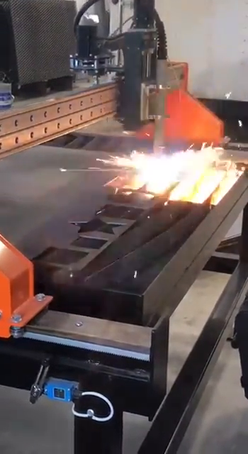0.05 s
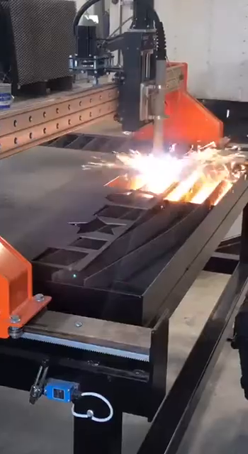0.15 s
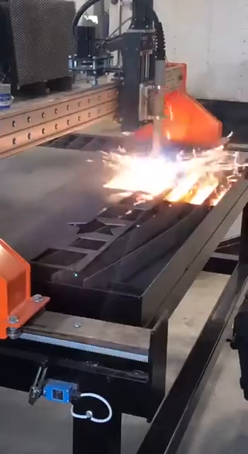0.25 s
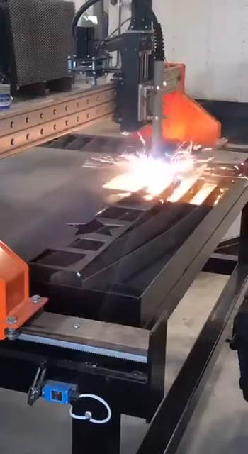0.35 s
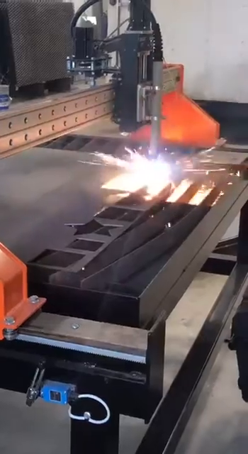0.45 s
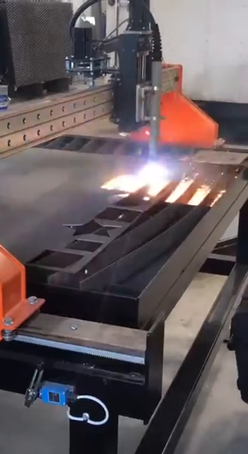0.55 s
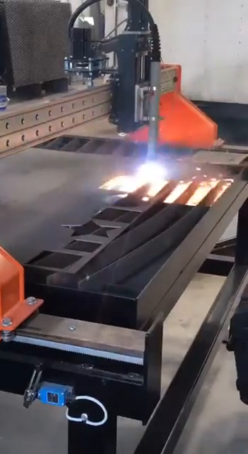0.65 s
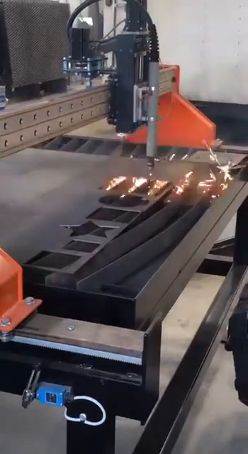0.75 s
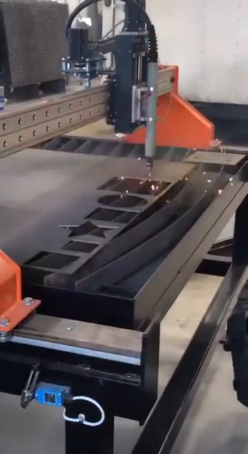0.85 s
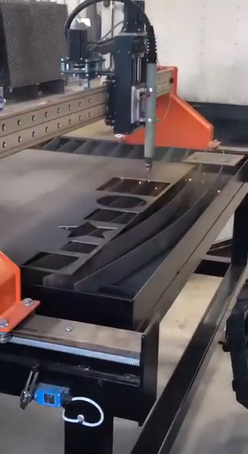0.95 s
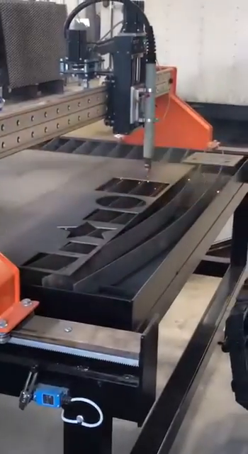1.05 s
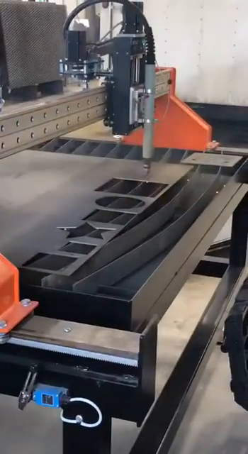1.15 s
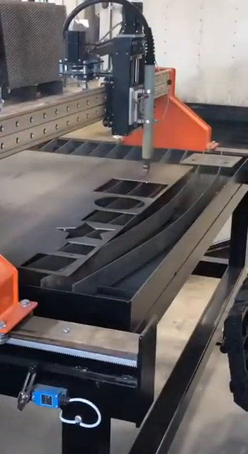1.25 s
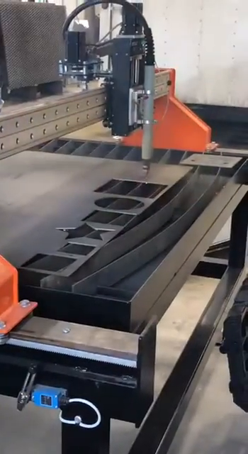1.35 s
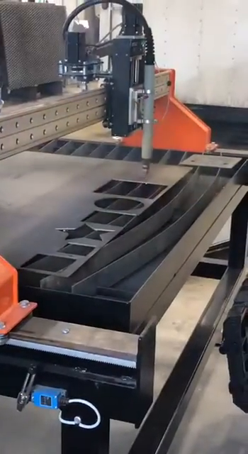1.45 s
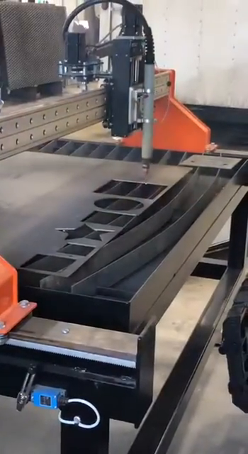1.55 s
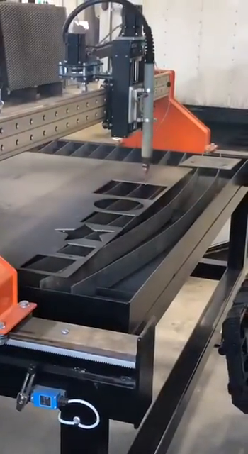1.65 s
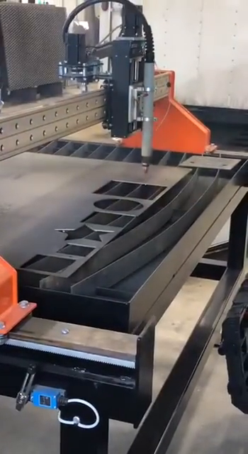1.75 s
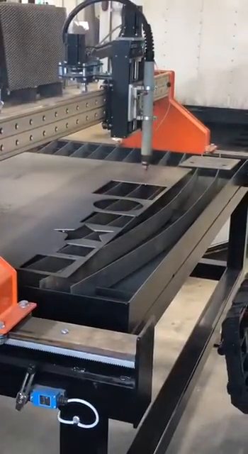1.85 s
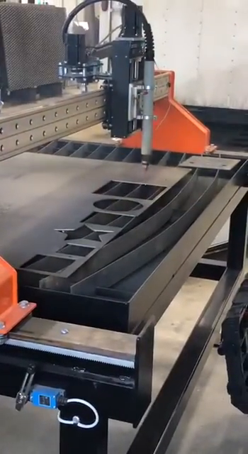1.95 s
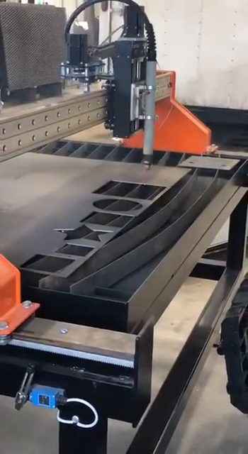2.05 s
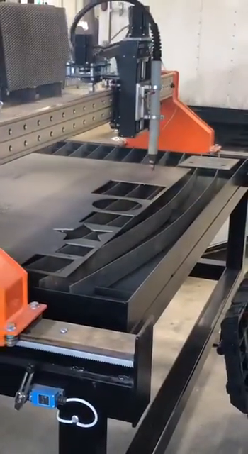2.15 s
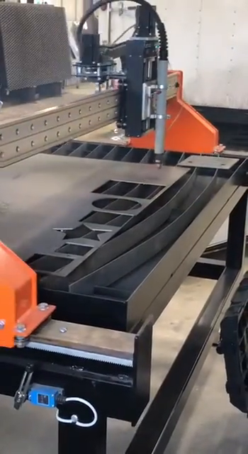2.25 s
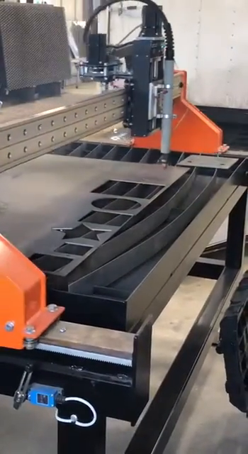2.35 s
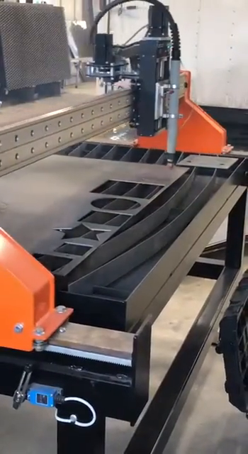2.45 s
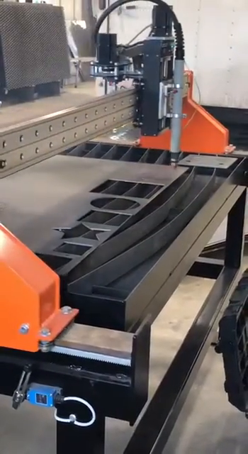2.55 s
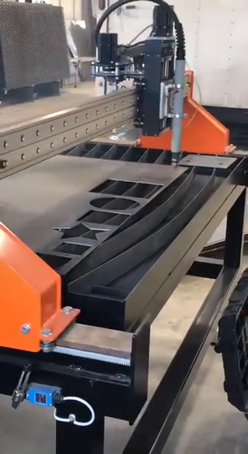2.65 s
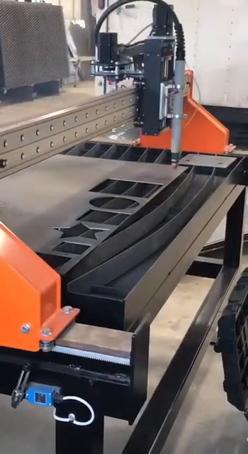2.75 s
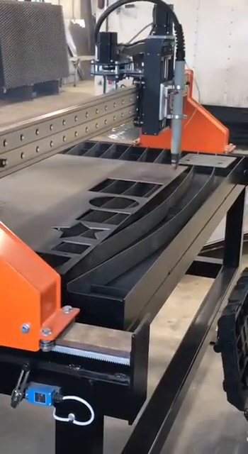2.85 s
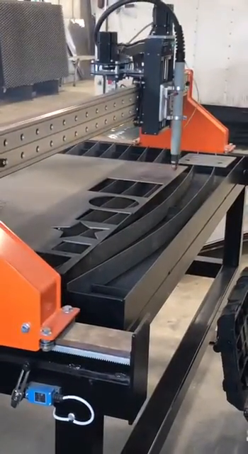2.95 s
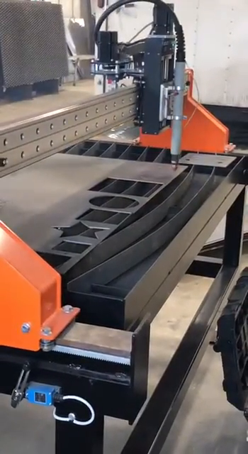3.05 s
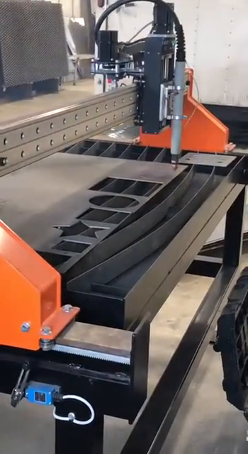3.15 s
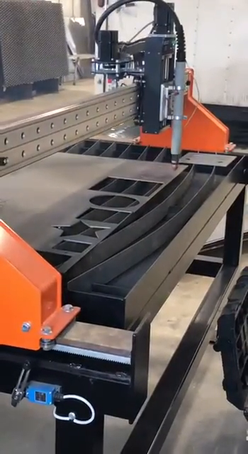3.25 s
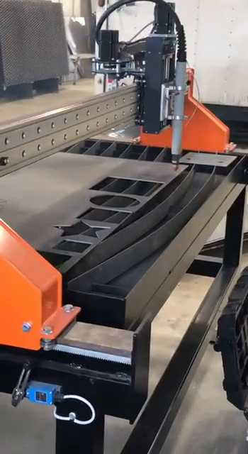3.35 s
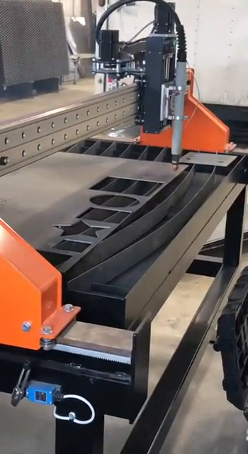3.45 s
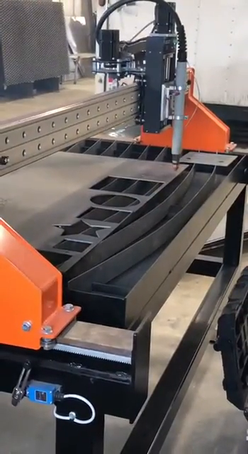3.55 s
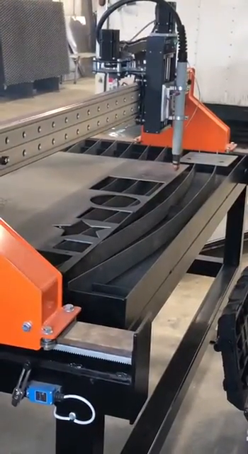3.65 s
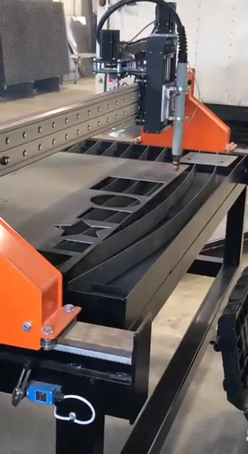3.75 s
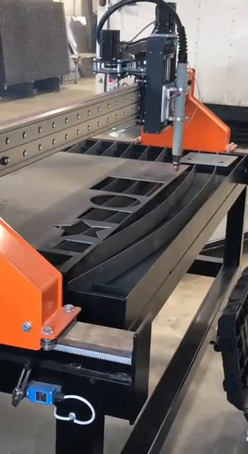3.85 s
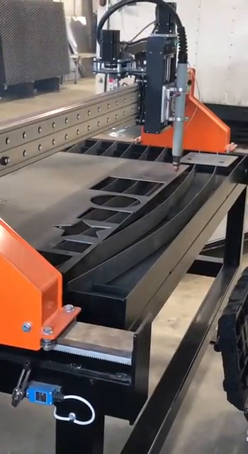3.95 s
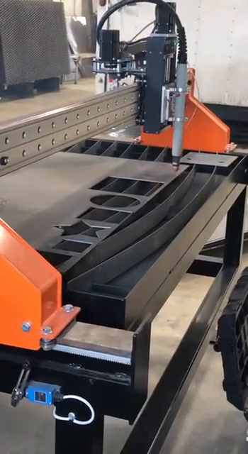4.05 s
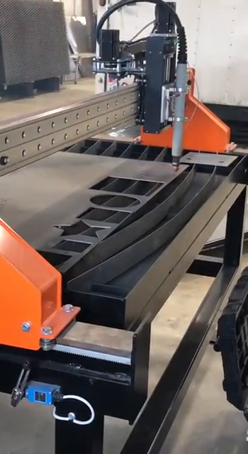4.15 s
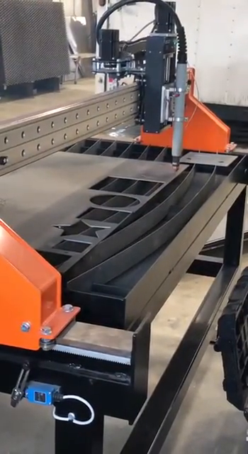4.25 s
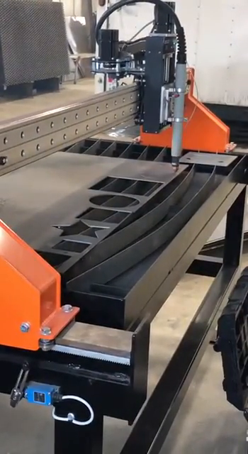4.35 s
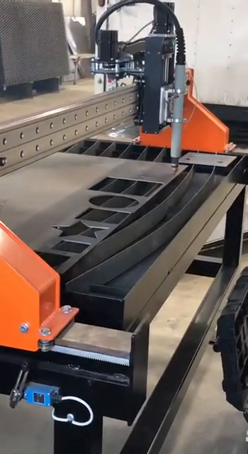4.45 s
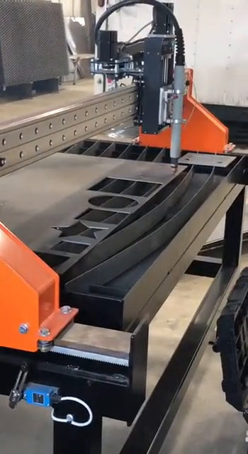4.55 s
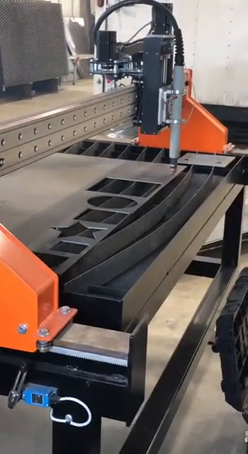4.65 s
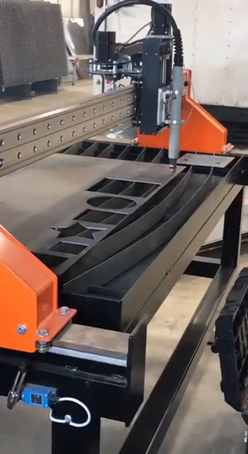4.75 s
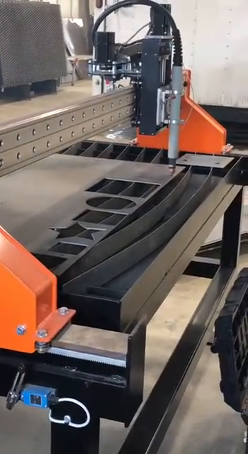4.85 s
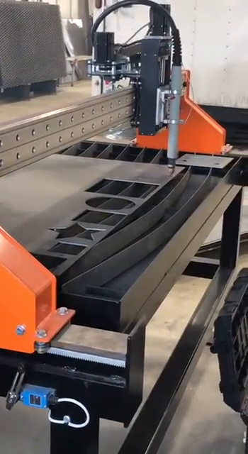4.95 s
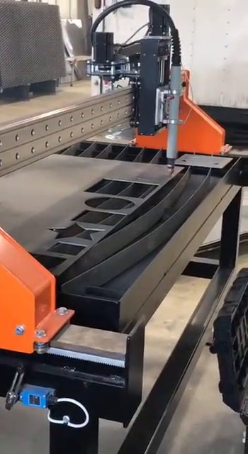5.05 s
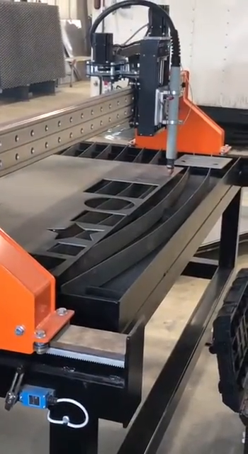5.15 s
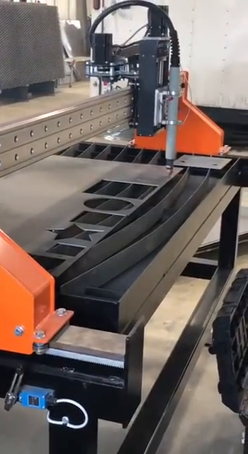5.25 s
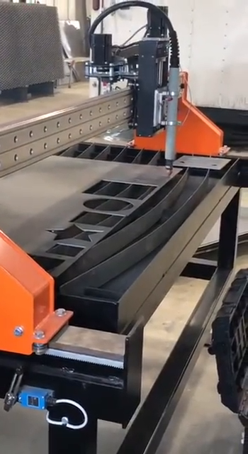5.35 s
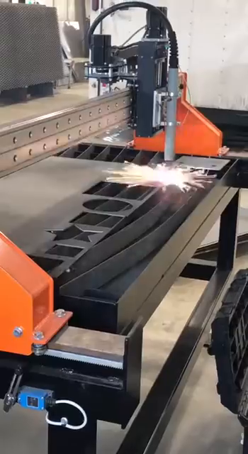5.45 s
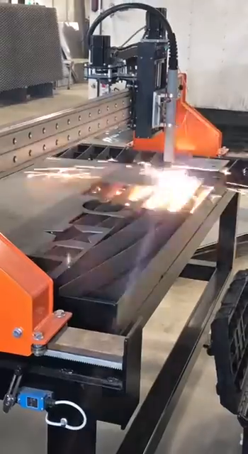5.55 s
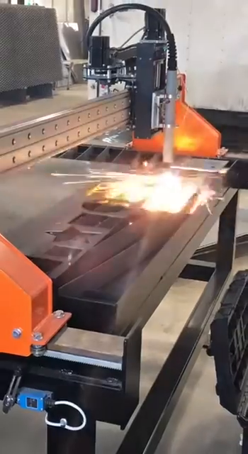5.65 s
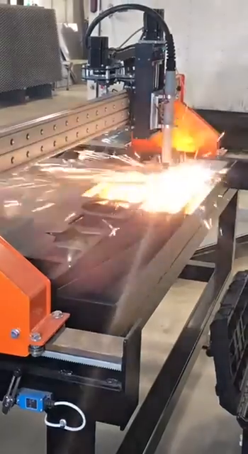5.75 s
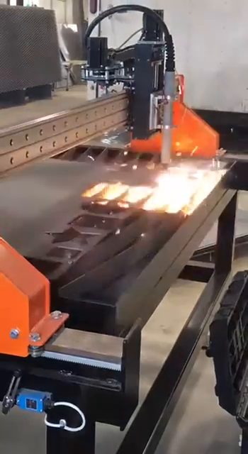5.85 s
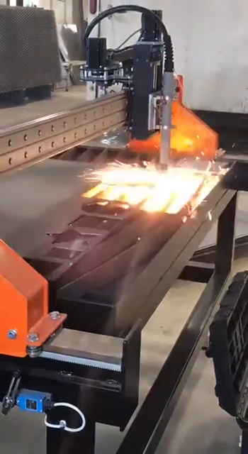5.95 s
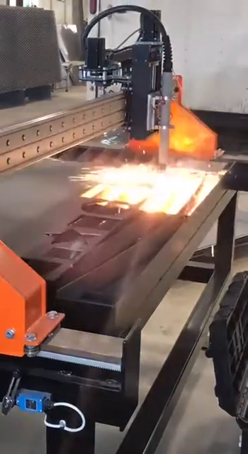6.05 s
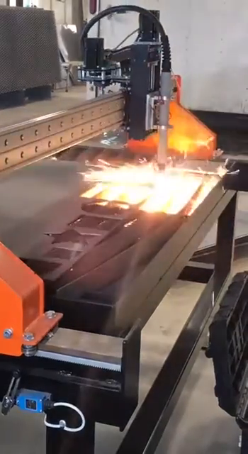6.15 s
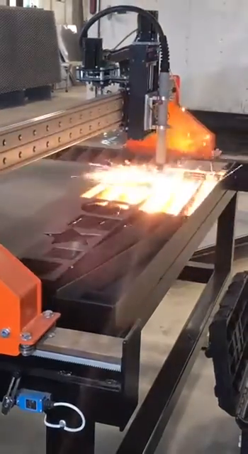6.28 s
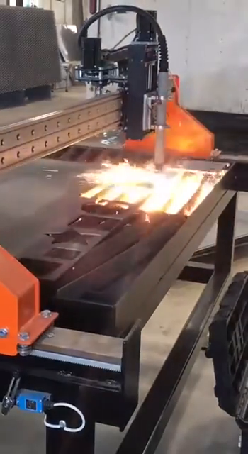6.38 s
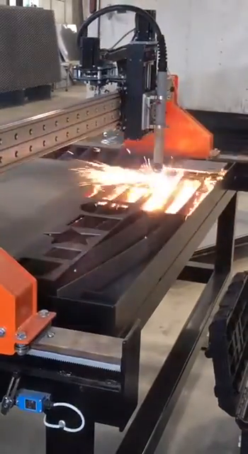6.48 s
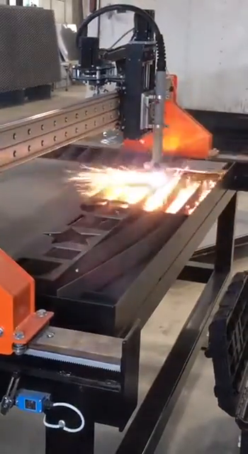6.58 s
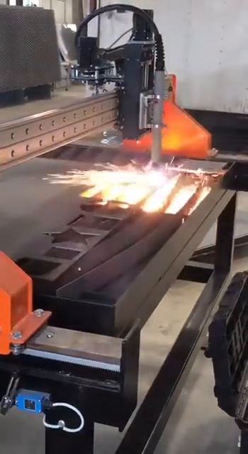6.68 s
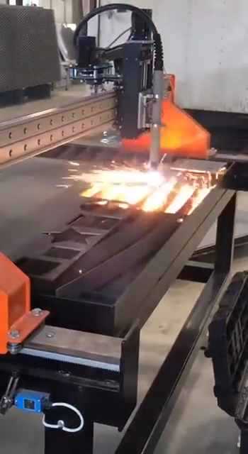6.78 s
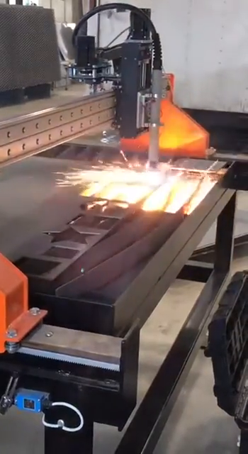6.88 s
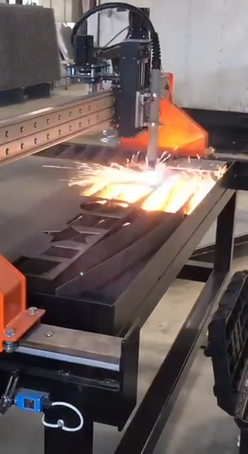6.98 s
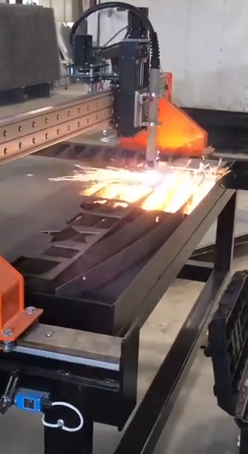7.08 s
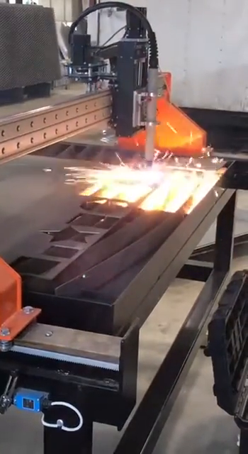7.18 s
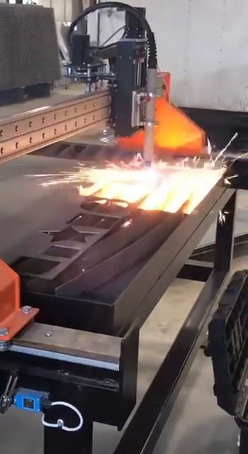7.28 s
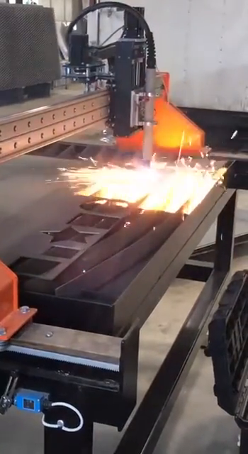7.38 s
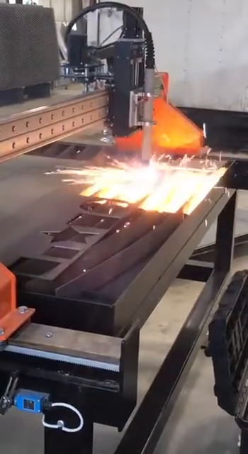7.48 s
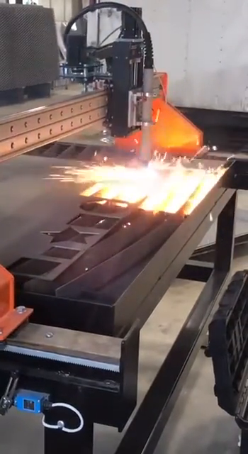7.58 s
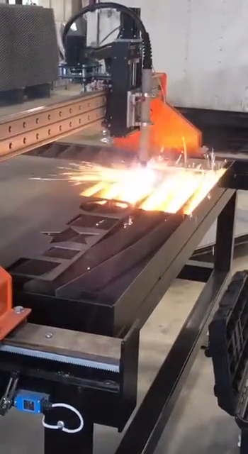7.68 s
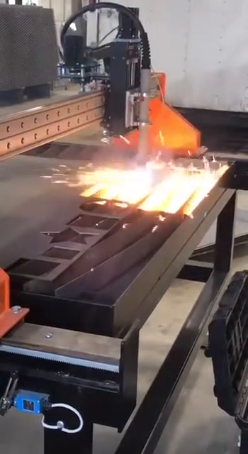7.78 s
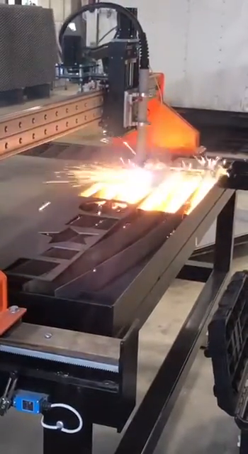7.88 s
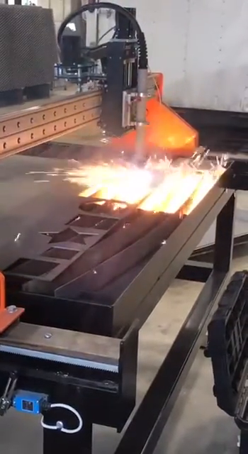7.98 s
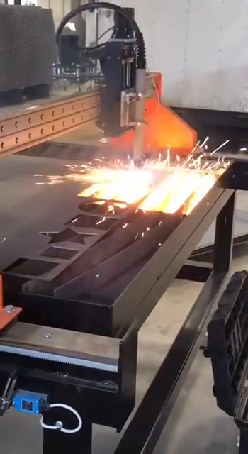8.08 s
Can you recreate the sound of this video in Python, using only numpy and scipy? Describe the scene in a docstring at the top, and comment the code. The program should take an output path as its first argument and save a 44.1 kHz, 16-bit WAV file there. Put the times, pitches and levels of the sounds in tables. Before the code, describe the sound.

In a workshop, a plasma torch tears through steel plate with a loud bright hiss and roar, ending in a sharp falling pop. Quieter cooling air blows on, swelling in brief whooshes as the gantry travels, with faint chirps and motor hum. A dull knock, air shutting off, a tiny tick, then a pop and the fierce sizzling cut resumes to the end. One close microphone, centred sound.

```python
"""A cutting arc hisses, whistles in the kerf and roars in the steel plate until the cut ends with a pop.
The plasma torch then blows cooling air as a gantry carries it over the slats; faint chirps fall amid the air flow.
It touches down with a knock, shuts its air, ticks and fires the next cut. Table and drive motors rumble and hum
in a workshop. Jet, air and rumble are shaped noise; hums, pops, chirps and knocks are sines. One microphone."""
import sys
import numpy as np
from scipy import signal
from scipy.fft import rfft, irfft, next_fast_len
from scipy.io import wavfile
from scipy.ndimage import uniform_filter1d, map_coordinates

SR = 44100
rng = np.random.default_rng(int(sys.argv[2]) if len(sys.argv) > 2 else 0)


def unload_audio(sound):
    """Save the sound as a 16-bit wav file, at the path given as the first command line argument."""
    columns = np.transpose(np.atleast_2d(sound))
    # keep every value between -1 and 1, then stretch to whole-number steps
    steps = np.round(np.clip(columns, -1, 1) * 32767)
    wavfile.write(sys.argv[1], SR, steps.astype(np.int16))


N = 358091


def amp(db):
    """Turn dB into a linear gain."""
    return 10 ** (np.asarray(db) / 20)


def unit(x):
    """Scale a signal to an rms of 1."""
    return x / np.sqrt(np.mean(x ** 2) + 1e-20)


def along(points, hz):
    """Read a curve of (Hz, value) points on a log frequency axis."""
    f, v = np.transpose(points)
    return np.interp(np.log(hz + 1), np.log(f + 1), v)


def curves(rows, linger=0):
    """One curve for each column after the time, and a gate open inside the rows (plus linger seconds)."""
    s, *cols = np.transpose(rows)
    t = np.arange(N) / SR
    is_open = 1. * ((t >= s[0]) & (t <= s[-1] + linger))
    gate = uniform_filter1d(is_open, size=180) ** .5
    return [np.interp(t, s, c) for c in cols] + [gate]


def wobble(rate):
    """A smooth random curve with so many knots a second."""
    knots = rng.standard_normal(int(N * rate / SR) + 4)
    return map_coordinates(knots, [np.arange(N) * rate / SR])


def swell(start, stop, rise, fall):
    """Gain 1 from start to stop (s), sloping off by dB/s on both sides."""
    t = np.arange(N) / SR
    early, late = np.maximum(start - t, 0), np.maximum(t - stop, 0)
    return amp(-rise * early - fall * late)


def blend(*gains):
    """Gains of unrelated noises add as powers."""
    return np.sqrt(sum(g ** 2 for g in gains))


def filtered(x, response):
    """Multiply the spectrum of x by a response of frequency."""
    m = next_fast_len(N + SR // 2)
    return irfft(rfft(x, m) * response(np.fft.rfftfreq(m, 1 / SR)), m)[..., :N]


def rush(spectrum, patchy_db, modes=(), lift=1, moving=()):
    """Turbulent noise of rms 1: patches of random gain, fixed resonances and moving ones (Hz, width Hz, dB)."""
    hz, t, z = signal.stft(rng.standard_normal(N), SR, nperseg=512)
    field = uniform_filter1d(rng.standard_normal(z.shape), size=6, axis=0)
    field = uniform_filter1d(field, size=12, axis=1)
    z = z * amp(patchy_db * unit(field))
    at = np.minimum((t * SR).astype(int), N - 1)
    for centre, width, db in moving:
        offset = (hz[:, None] - centre[at]) * 2 / width
        z = z * amp(db[at] / (1 + offset ** 2))
    noise = signal.istft(z, SR, nperseg=512)[1][:N]

    def response(f):
        peaks = 1 + sum(lift * amp(db) / (1 + ((f - c) * 2 / w) ** 2) for c, w, db in modes)
        return amp(along(spectrum, f)) * peaks
    return unit(filtered(noise, response))


def arc():
    """The plasma jet tears the air; molten steel spits, and the plate roars at its resonances."""
    # The end of one cut, then the pierce and the straight run of the next.
    # Each row: time in seconds, jet hiss in dB, plate roar in dB, lift of the high whistle in dB.
    cuts = [
        [(0.0, -18, -25.5, 8), (0.06, -17, -26.5, 7), (0.2, -16, -30, 8), (0.27, -18, -33.5, 2),
         (0.33, -15.5, -28, 1), (0.514, -17.5, -24.5, 3), (0.74, -14.5, -28.5, 1), (0.782, -15.5, -27, 0)],
        [(5.512, -42, -53, -2), (5.521, -29, -41, 0), (5.535, -23, -34, -1), (5.602, -19, -36.5, -3),
         (5.615, -16.5, -26, 3), (5.649, -16.5, -35.5, 3.5), (5.833, -16.5, -19, 4.5), (5.947, -14.5, -29.5, 3),
         (6.057, -15.5, -20, 3), (6.257, -15.5, -20, 1.5), (6.45, -16.5, -22.5, 5), (6.65, -14.5, -24.5, 3)],
        [(6.667, -16.5, -23, 1), (6.7, -14.5, -24, 2.5), (7.1, -15.5, -23.5, 0.5), (7.53, -16, -25, -1),
         (7.798, -17.5, -25.5, 2.5), (7.9, -15, -25.5, 3), (8.12, -16, -25, 0)],
    ]
    # Plate resonances near each stretch of cutting. Each row: centre in Hz, width in Hz, peak in dB before lift.
    plates = [
        [(1133, 43, 6.5), (1400, 56, -3), (1774, 82, 2), (2200, 47, 4), (3040, 57, -4), (3750, 40, -6)],
        [(1050, 57, -5), (1303, 64, 3), (2014, 100, 0), (2250, 55, 0), (2520, 64, -5), (2890, 43, 3),
         (3350, 90, -1), (3620, 62, -8)],
        [(710, 85, -5), (1060, 23, -5), (1300, 81, -4), (1790, 54, -8), (2150, 140, -7), (3310, 140, -3)],
    ]
    # How far the sizzle sits over the blend of jet and roar: one value in dB for each stretch.
    sizzle_over_db = [-3.5, -3, -2]
    roar_share = 0.38  # of the roar in that blend
    # Noise colours of tearing jet, spitting melt and plate. Each row: frequency in Hz, relative dB per Hz.
    jet_colour = [(3240, -27), (5500, -5), (8190, 0), (10200, -1.5), (11500, -2.5), (11900, -13.5),
                  (12300, -15), (16000, -49), (22000, -120)]
    sizzle_colour = [(1350, -15.5), (2300, -5.5), (2720, -3), (3380, 1), (4030, 0), (4930, -0.5),
                     (6300, -4), (8190, -6.5), (13900, -120)]
    roar_colour = [(250, -35), (420, -22), (540, -5), (1030, -2.5), (1140, -5), (1290, -3.5), (2600, -8),
                   (3380, -29), (5720, -120)]
    # The low and the high whistle in the kerf. Each row: centre in Hz, width in Hz.
    kerf_whistles = [(7950, 820), (10050, 970)]
    low_whistle_db, drift_hz, swing_db, whistle_rate = 2, 220, 1.1, 9  # rate in knots a second
    pierce_s, through_s, melt_rise = 5.5, 5.69, 18  # the sizzle grows by dB/s until the jet is through

    out = np.zeros(N)
    *_, high_db, _ = curves(np.vstack(cuts))
    whistles = []
    for (hz, width), db in zip(kerf_whistles, [low_whistle_db, high_db]):
        centre = hz + drift_hz * wobble(whistle_rate)
        whistles.append((centre, width, db + swing_db * wobble(whistle_rate)))

    flicker = wobble(14)  # the arc root jumps about in the kerf
    jet = amp(0.25 * flicker + 0.53 * wobble(45)) * rush(jet_colour, patchy_db=1.56, moving=whistles)
    piercing = swell(through_s, N / SR, melt_rise, 0)
    melt = np.where(np.arange(N) / SR < pierce_s, 1, piercing) * amp(0.27 * flicker)
    seethe = amp(0.4 * flicker + 0.64 * wobble(22))

    for rows, plate, over_db in zip(cuts, plates, sizzle_over_db):
        jet_db, roar_db, _, gate = curves(rows, linger=.014)
        sizzle_db = over_db + jet_db + roar_share * (roar_db - jet_db)
        sizzle = amp(sizzle_db) * melt * rush(sizzle_colour, patchy_db=0.77, modes=plate, lift=0.8)
        roar = amp(roar_db) * seethe * rush(roar_colour, patchy_db=1.1, modes=plate, lift=1.0)
        out += gate * (amp(jet_db) * jet + sizzle + roar)
    return out


def air():
    """Compressed air leaves the nozzle and washes over plate and slats; the cut's echo fades under it."""
    # Cooling air while the torch travels, waits and descends.
    # Each row: time in seconds, nozzle hiss in dB, wash on the slats in dB, hollow rush in dB.
    air_flow = [(0.8, -33, -28.5, -37), (1.21, -29, -30, -32.5), (1.46, -28, -33.5, -33),
                (2.28, -29, -41, -33.5), (2.52, -26, -35, -39.5), (3.0, -25.5, -35, -45),
                (3.1, -27.5, -33, -44), (4.6, -28, -34.5, -46), (4.8, -29, -34.5, -41),
                (5.17, -27.5, -34, -47), (5.516, -30, -35.5, -49)]
    # The air strikes something under the passing torch.
    # Each row: start in seconds, stop in seconds, rise in dB/s, fall in dB/s, hiss in dB, wash in dB.
    sweeps = [(1.72, 1.899, 32, 16, -24, -27.5), (1.997, 2.08, 29, 50, -23.5, -21.5),
              (2.388, 2.398, 160, 95, -24, -23)]
    # Slat resonances. Each row: centre in Hz, width in Hz, peak in dB before lift.
    slats = [(3680, 72, 7), (4510, 130, 13), (6630, 31, 0), (8950, 1000, 0)]
    # Noise colours of hiss, wash and hollow rush. Each row: frequency in Hz, relative dB per Hz.
    nozzle_colour = [(3240, -19.5), (5500, -6), (5960, -6), (6440, -6), (7730, -7), (8550, -3.5),
                     (9310, -6.5), (11600, -8.5), (12300, -27), (16000, -43), (22000, -120)]
    wash_colour = [(1350, -33), (2300, -7.5), (2670, -7.5), (3380, -2.5), (4100, -5), (4500, -6),
                   (4870, -3.5), (6300, -6), (8190, -5), (13900, -120)]
    hollow_colour = [(290, -32), (500, -9), (816, -9.5), (930, -5.5), (1180, -2.5), (1450, -2.5),
                     (1570, -0.5), (1990, -5), (2600, -12), (3380, -15.5), (5720, -120)]
    # The cut's echo in hiss, wash and hollow rush, in dB.
    echo_levels = [-22, -25, -34]
    # How fast hiss, wash and hollow rush die once the valve shuts, in dB/s.
    bleed_rates = [78, 35, 30]
    arc_off_s, echo_fall, valve_s = 0.79, 90, 5.163  # echo fall in dB/s

    *flow_db, gate = curves(air_flow)
    echo = swell(0, arc_off_s, 0, echo_fall)
    gains = []
    for db, echo_db, bleed in zip(flow_db, echo_levels, bleed_rates):
        with_echo = blend(amp(db), amp(echo_db) * echo)
        gains.append(with_echo * swell(0, valve_s, 0, bleed))
    hiss, wash, hollow = gains
    hiss = blend(hiss, *[amp(db) * swell(*shape) for *shape, db, _ in sweeps])
    wash = blend(wash, *[amp(db) * swell(*shape) for *shape, _, db in sweeps])

    flutter = wobble(9.2)
    hiss = hiss * amp(0.45 * flutter) * rush(nozzle_colour, patchy_db=0.5, modes=slats, lift=0.18)
    wash = wash * amp(0.63 * flutter) * rush(wash_colour, patchy_db=0.66, modes=slats, lift=0.23)
    hollow = hollow * amp(0.84 * wobble(12)) * rush(hollow_colour, patchy_db=1.0)
    return gate * (hiss + wash + hollow)


def pops():
    """Arc pops fall in pitch as the gas bubble grows."""
    # Each row: start in seconds, level in dB, start pitch in Hz, end pitch in Hz, t60 in seconds.
    pop_events = [(0.7871, -3.5, 2610, 450, 0.02), (5.535, -25, 2000, 800, 0.011),
                  (5.739, -11, 1800, 497, 0.013)]
    out, t = np.zeros(N + SR), np.arange(SR // 4) / SR
    for s, db, start_hz, end_hz, t60 in pop_events:
        hz = end_hz + (start_hz - end_hz) * np.exp(-t / 0.00188)
        phase = 2 * np.pi * np.cumsum(hz) / SR
        out[round(s * SR):][:len(t)] += amp(db - 60 * t / t60) * -np.sin(phase)
    return out[:N]


def knocks():
    """Touch-down and pierce ring the carriage, a set of decaying modes."""
    # Torch touches down, arc pierces.
    # Each row: start in seconds, level in dB before a 10 dB cut, depth in dB per octave below 300 Hz.
    knock_events = [(5.104, -24, -6), (5.612, -27, 7)]
    # Modes of the carriage. Each row: frequency in Hz, level in dB before depth and chance, t60 in seconds.
    carriage = [(131, 1, .12), (240, -11, .08), (316, 0, 0.12), (368, 5, 0.089), (520, -16, .05),
                (790, -16, 0.046)]
    out, t = np.zeros(N + SR), np.arange(SR // 4) / SR
    for s, db, depth_db in knock_events:
        ring = np.zeros(len(t))
        for hz, level, t60 in carriage:
            mode_db = level + depth_db * np.log2(300 / hz) + rng.normal(0, 2.3)
            ring += amp(mode_db - 60 * t / t60) * np.sin(2 * np.pi * hz * t)
        out[round(s * SR):][:len(t)] += amp(db - 10) * ring
    return out[:N]


def chirps():
    """Short faint whistles glide down during the air flow, in the travel and after it."""
    # Each row: start in seconds, level in dB, start pitch in Hz, end pitch in Hz, length in seconds.
    chirp_events = [(2.53, -32.5, 1750, 1490, 0.047), (2.583, -34, 1336, 1050, 0.037),
                    (2.78, -39, 1240, 1184, 0.034), (3.042, -37, 1275, 1151, 0.028),
                    (4.92, -39, 1220, 1170, .03), (4.975, -39, 1240, 1180, .025)]
    out = np.zeros(N)
    for s, db, start_hz, end_hz, length in chirp_events:
        n = round(length * SR)
        phase = 2 * np.pi * np.cumsum(np.linspace(start_hz, end_hz, n)) / SR
        out[round(s * SR):][:n] += amp(db) * np.hanning(n) * np.sin(phase)
    return out


def ticks():
    """A relay or valve ticks before the arc fires: a short burst of noise."""
    # Each row: time in seconds, level in dB.
    tick_events = [(5.495, -35)]
    # Noise colour of the tick. Each row: frequency in Hz, relative dB per Hz.
    tick_colour = [(500, -30), (1200, -3), (4000, 0), (11000, -3)]
    rise, fall = 2500, 1800  # dB/s
    noise = unit(filtered(rng.standard_normal(N), lambda hz: amp(along(tick_colour, hz))))
    return noise * sum(swell(s, s, rise, fall) * amp(db) for s, db in tick_events)


def machine():
    """The table rumbles under jet and drives; motors and plate hum slightly unsteady tones."""
    # Table and gantry shake under arc, pop, travel, touch-down and arc.
    # Each row: start in seconds, stop in seconds, rise in dB/s, fall in dB/s, frame in dB, sheet in dB.
    shakes = [(0, .78, 50, 31, -39, -39.5), (0.792, 0.804, 3000, 102, -34, -34.5),
              (2.1, 2.82, 200, 36, -43.5, -46), (5.105, 5.12, 900, 80, -47, -45),
              (5.85, 8.12, 45, 50, -37, -35)]
    # Frame and sheet at rest, in dB.
    idle_db = [-55.5, -56]
    # Noise colours of frame and sheet. Each row: frequency in Hz, relative dB per Hz.
    frame_colour = [(13, -61), (22, -43), (86, -19), (108, -9), (134, 2), (161, -4), (193, 2.5),
                    (221, -3.5), (270, -3.5), (350, -25), (590, -120)]
    sheet_colour = [(140, -45), (230, -10.5), (258, -0.5), (334, 0), (461, -4.5), (560, 0.5), (730, -30),
                    (1230, -120)]
    # Hollow modes of the table. Each row: centre in Hz, width in Hz, peak in dB before lift.
    table_modes = [(186, 180, 0.5)]
    # Motors and the singing plate.
    # Each row: start in seconds, stop in seconds, pitch in Hz, level in dB, drift in Hz, swing in dB.
    hums = [(2.15, 2.85, 240, -46.5, 4, 4.5), (3.43, 5.0, 166.5, -50, .4, 1.5),
            (7.3, 8.12, 186, -38, .5, 0), (7, 8.12, 731, -34, 2.476, 2)]
    shudder_db, hum_rise, hum_fall = 1.6, 40, 60  # rise and fall in dB/s

    frame = blend(amp(idle_db[0]), *[amp(db) * swell(*shape) for *shape, db, _ in shakes])
    sheet = blend(amp(idle_db[1]), *[amp(db) * swell(*shape) for *shape, _, db in shakes])
    frame = frame * amp(shudder_db * wobble(7))
    sheet = sheet * amp(shudder_db * wobble(7))
    out = frame * rush(frame_colour, patchy_db=2.0, modes=table_modes, lift=0.87)
    out += sheet * rush(sheet_colour, patchy_db=0.9, modes=table_modes, lift=.8)

    for start, stop, hz, db, drift_hz, swing_db in hums:
        phase = 2 * np.pi * np.cumsum(hz + drift_hz * wobble(5)) / SR
        level = amp(db + swing_db * wobble(5))
        out += swell(start, stop, hum_rise, hum_fall) * level * np.sin(phase)
    return out


def workshop():
    """The steady background of the workshop is a quiet band of noise."""
    # Each row: frequency in Hz, relative dB per Hz.
    workshop_colour = [(450, -40), (650, -2), (900, 0), (1400, -8), (2500, -40)]
    return amp(-62) * rush(workshop_colour, patchy_db=2.0)


def reflections(x, comb_db):
    """Echoes from table and walls comb the spectrum finely: a random gain pattern that drifts in time."""
    z = signal.stft(x, nperseg=2048)[2]
    field = uniform_filter1d(rng.standard_normal(z.shape), size=3, axis=0)
    field = unit(uniform_filter1d(field, size=16, axis=1))
    gain = amp(comb_db * field)
    return signal.istft(z * gain / np.sqrt(np.mean(gain ** 2)), nperseg=2048)[1][:N]


def shop(x):
    """Each frequency of the room's answer, a tail of noise, dies at its own speed."""
    # Each row: frequency in Hz, t60 in seconds.
    shop_decay = [(200, 0.82), (2000, 1), (10000, 0.27)]
    hz, t, z = signal.stft(rng.standard_normal(SR), SR, nperseg=256)
    decay = amp(-60 * t / along(shop_decay, hz)[:, None])
    tail = signal.istft(z * decay, SR, nperseg=256)[1]
    delayed = np.pad(x, (400, 0))
    return signal.fftconvolve(delayed, tail / np.linalg.norm(tail))[:N]


def scene():
    """Mix the combed jet and air, the machine and background, and the short blows with their room answer."""
    blows = pops() + knocks() + chirps() + ticks()
    noise = reflections(arc(), comb_db=2.0) + reflections(air(), comb_db=2.0)
    mix = noise + machine() + workshop() + blows + amp(-7.5) * shop(blows)
    return np.tile(mix, (2, 1))  # the same signal on both channels


def record(dry):
    """The microphone rounds off the highest peaks, thins the bass and keeps nothing above its band limit."""
    # Each row: frequency in Hz, gain in dB.
    microphone = [(20, -16), (60, -8.5), (110, -1), (11500, 1), (11900, 1), (12400, -9)]
    top_hz = 12440
    held = dry / (1 + np.abs(dry / .95) ** 8) ** (1 / 8)
    return filtered(held, lambda hz: amp(along(microphone, hz)) * (hz < top_hz))


dry = scene()
out = record(dry)
unload_audio(out)
```